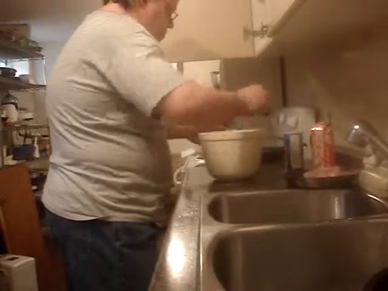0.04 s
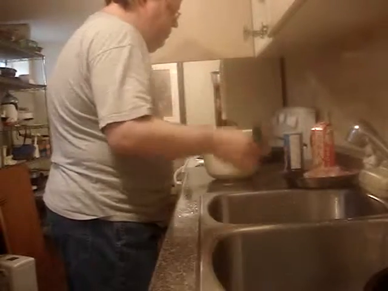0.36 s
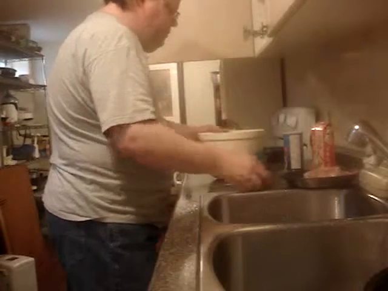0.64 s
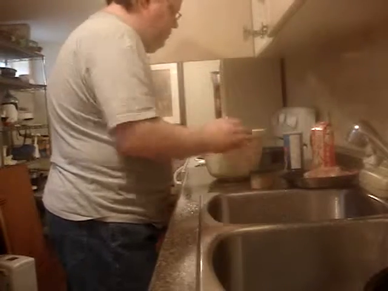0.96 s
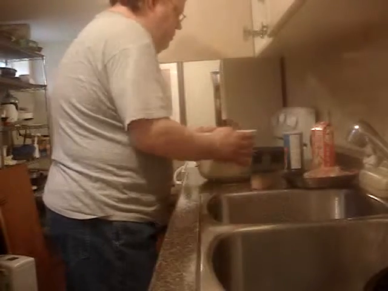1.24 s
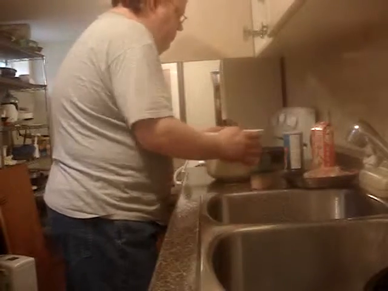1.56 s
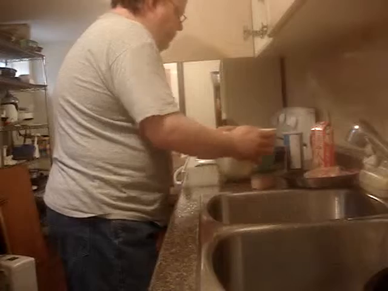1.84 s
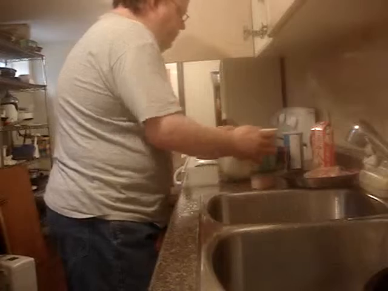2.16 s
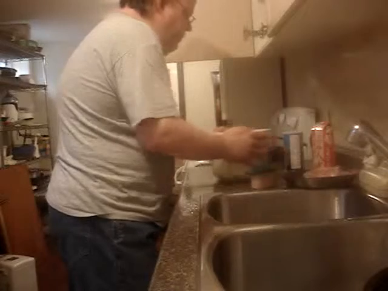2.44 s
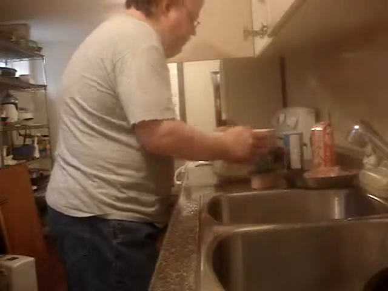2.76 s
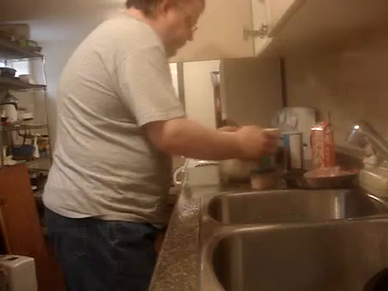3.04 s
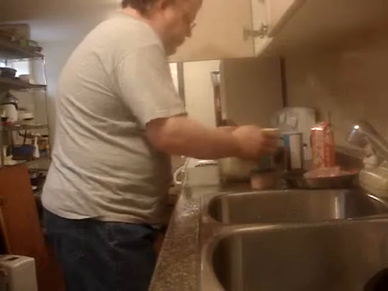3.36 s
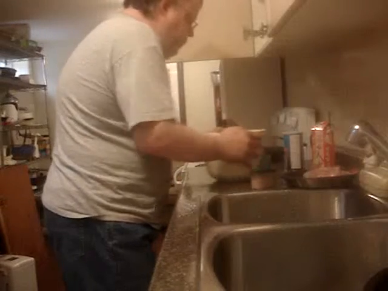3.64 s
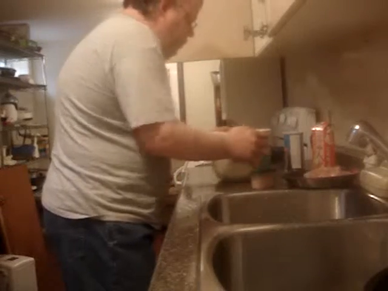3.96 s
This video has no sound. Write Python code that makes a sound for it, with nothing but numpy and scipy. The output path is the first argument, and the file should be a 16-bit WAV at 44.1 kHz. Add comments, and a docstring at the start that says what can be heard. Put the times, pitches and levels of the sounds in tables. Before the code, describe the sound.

A plastic tub is shaken in a small, hard kitchen. First, from 0.7 to 0.9 seconds, a small container rocks to rest on the counter in four ringing clacks, the loudest thumping the microphone. From 1.2 to 4 seconds the tub shakes about eight strokes a second: dry coating swishes, walls rumble and heavier pieces thud, louder after 3 seconds. Faint room noise, hum and a thin whine continue throughout.

```python
"""Faint room noise, an appliance hum and a thin whine fill a hard little kitchen. A small container is
set down and rocks to rest in four clacks that ring it and the counter; the loudest overload the recorder
with a low thump. Then a lidded plastic tub is shaken about eight strokes a second: dry coating swishes
along the plastic, the walls rumble under the load and heavier pieces thud against them.
A limiter holds down loud peaks."""
import sys
import numpy as np
from scipy import signal
from scipy.fft import rfft, irfft
from scipy.io import wavfile
from scipy.ndimage import uniform_filter1d, minimum_filter1d

SR = 44100
rng = np.random.default_rng(int(sys.argv[2]) if len(sys.argv) > 2 else 0)


def int16_out(signal):
    """Quantize to a 16-bit WAV file."""
    q = np.round(np.clip(np.atleast_2d(signal).T, -1, 1) * 32767)
    wavfile.write(sys.argv[1], SR, q.astype(np.int16))


N = 176400
TIME_S = np.arange(N) / SR
EVENT_S = np.arange(SR // 2) / SR
CONTACT_RISE_S, STROKE_LEAD_S = 0.0019, 0.1

# Shake strokes: t/s of fastest slide, relative level/dB, length/usual stroke
SHAKE_STROKES = [(1.213, -9, .6), (1.339, -7, 0.78), (1.44, -7, 0.73), (1.477, -1, .9), (1.605, -2.5, 0.97),
                 (1.734, -2.5, 1.1), (1.86, -5, 1), (1.975, -1.5, .9), (2.10, -2.5, 1.07),
                 (2.217, -1, 0.98), (2.349, -1.5, .9), (2.462, 1.5, 0.86), (2.58, -0.5, 1.08),
                 (2.703, 0.5, 1.23), (2.826, 1, 0.85), (2.942, -0.5, 1.13), (3.069, 1.5, 0.93),
                 (3.18, -0.5, 1.17), (3.319, -0.5, 1.21), (3.42, 1.5, 0.68), (3.544, -1, 1.15),
                 (3.655, -2, 1.03), (3.774, -2, 1.23), (3.885, -0.5, 0.97), (3.995, 1, 0.65)]


def amp(db):
    """Decibels to gain."""
    return 10 ** (np.asarray(db) / 20)


def unit(x):
    """Scale to rms 1."""
    return x / np.sqrt(np.mean(x ** 2) + 1e-20)


def read(points, hz):
    """Interpolate on a log-frequency axis."""
    f, value = np.transpose(points)
    return np.interp(np.log(hz + 1), np.log(f + 1), value)


def gain_curve(points):
    """Scene-long gain from (t/s, level/dB) points."""
    return amp(np.interp(TIME_S, *np.transpose(points)))


def add(mix, start_s, sound):
    """Mix a sound in at start_s."""
    part = mix[round(start_s * SR):][:len(sound)]
    part += sound[:len(part)]


def colour(x, points, size=4096):
    """Minimum-phase filter of unit energy, shaped by (f/Hz, level/dB) points."""
    log_gain = np.log(amp(read(points, abs(np.fft.fftfreq(size, 1 / SR)))))
    taps = np.fft.ifft(np.exp(np.conj(signal.hilbert(log_gain)))).real
    return signal.oaconvolve(x, taps / np.linalg.norm(taps))[:len(x)]


def room_noise():
    """Dull steady noise, a little louder at the start."""
    # Noise spectrum: f/Hz, relative level/dB
    spectrum = [(25, -11), (80, -21), (120, -5), (150, -8.5), (210, -3.5), (300, -9.5), (700, -8.5),
                (1200, -14), (3000, -18.5), (5000, -23), (8000, -25.5), (10000, -27)]
    # Noise envelope: t/s, level/dB
    levels = [(0, -43.5), (.15, -48), (.35, -50), (4, -48)]
    return gain_curve(levels) * colour(rng.standard_normal(N), spectrum)


def appliance_hum(hz=119.6, rms_db=-58.5):
    """One low steady tone."""
    return amp(rms_db) * unit(np.sin(2 * np.pi * hz * TIME_S))


def whine(centre_hz=7900, half_width_hz=97, rms_db=-65):
    """A narrow band of high noise."""
    hz = np.fft.rfftfreq(N, 1 / SR)
    band = 1 / (1 + ((hz - centre_hz) / half_width_hz) ** 2)
    return amp(rms_db) * unit(irfft(rfft(rng.standard_normal(N)) * band, N))


def chatter(t60_s):
    """Noise of one contact: quick swell, exponential decay."""
    attack = np.minimum(EVENT_S / CONTACT_RISE_S, 1)
    return rng.standard_normal(len(EVENT_S)) * attack * amp(-60 * EVENT_S / t60_s)


def container_clacks(crack_db=-6, ring_db=-26, emphasis_octaves=0.97):
    """Each contact cracks, ticks and rings the counter, favouring its own pitch range."""
    # Contacts: t/s, relative level/dB, emphasis f/Hz, emphasis/dB, tick/dB, overload thump/dB
    contacts = [(.690, 4.5, 567, 4.5, -22, -21), (.773, -3, 427, 5, -21, -55),
                (0.8644, -3, 1500, 9, -27.5, -25.5), (.917, -10, 450, 6.5, -58, -65)]
    # Crack spectrum: f/Hz, relative level/dB
    crack_spectrum = [(50, -47), (120, -13.5), (200, -4.5), (330, 1), (560, 0.5), (850, -1), (1200, -6),
                      (1800, -9), (2500, -18), (3500, -30.5), (7000, -40), (10000, -41)]
    # Tick spectrum: f/Hz, relative level/dB
    tick_spectrum = [(500, -32), (1500, -4), (2500, 10), (4000, -2), (7000, -8.5), (10000, -25)]
    # Container and counter modes: f/Hz, relative level/dB, t60/s
    counter_modes = [(369, 2.5, 0.21), (539, 2, 0.15), (588, -7, 0.19), (757, -4, 0.4), (855, -5, 0.27),
                     (1038, -14, 0.27), (1090, -5.5, 0.25), (1200, -11, .25), (1216, -8.5, .22),
                     (1524, -1, .2), (1770, -9, .15), (2490, -16, .2)]
    out = np.zeros(N)
    attack = np.minimum(EVENT_S / CONTACT_RISE_S, 1)
    for start_s, db, emphasis_hz, emphasis_db, tick_db, thump_db in contacts:
        def boost_db(hz):
            return emphasis_db * np.exp(-(np.log2(hz / emphasis_hz) / emphasis_octaves) ** 2 / 2)
        boosted = [(hz, level_db + boost_db(hz)) for hz, level_db in crack_spectrum]
        crack = amp(db + crack_db) * colour(chatter(t60_s=0.067), boosted)
        tick = amp(tick_db) * colour(chatter(t60_s=0.048), tick_spectrum)
        ring = np.zeros(len(EVENT_S))
        for hz, mode_db, t60_s in counter_modes:
            decay = amp(mode_db + boost_db(hz) - 60 * EVENT_S / t60_s)
            ring += decay * np.sin(2 * np.pi * (hz * EVENT_S + rng.random()))
        add(out, start_s, kitchen(crack + tick, wet_db=-6))
        add(out, start_s, amp(db + ring_db) * ring * attack + overload_thump(thump_db))
    return out


def overload_thump(peak_db, rise_s=0.0015):
    """Low one-sided pulse of the recorder overloading on a loud clack."""
    return amp(peak_db) * EVENT_S / rise_s * np.exp(1 - EVENT_S / rise_s)


def kitchen(x, wet_db, predelay_s=0.004):
    """Add dense reflections, each band dying at its own rate."""
    # Room decay: f/Hz, t60/s
    room_t60 = [(100, 0.24), (250, .33), (550, 0.43), (1400, 0.43), (3700, 0.3), (10000, 0.14)]
    reflections = rng.standard_normal(len(EVENT_S)) * (EVENT_S > predelay_s)
    hz, t, bands = signal.stft(reflections, SR, nperseg=256)
    fade = amp(-60 * t / read(room_t60, hz)[:, None])
    tail = signal.istft(bands * fade, SR, nperseg=256)[1]
    return x + amp(wet_db) * signal.oaconvolve(x, tail / np.linalg.norm(tail))[:len(x)]


def slide(length, rise_s=0.03, fall_s=0.028):
    """Envelope of one stroke's slide, stretched by length, peaking at STROKE_LEAD_S."""
    t = EVENT_S - STROKE_LEAD_S
    width_s = length * np.where(t < 0, rise_s, fall_s)
    return np.exp(-abs(t / width_s) ** 1.5 / 2)


def coating_swish(gain_db=-33.5, grains_per_s=9000, spread_db=1.5, clump_db=1.9, clump_s=0.014):
    """Each stroke throws a clumpy shower of crumbs along the plastic."""
    # Crumbs on plastic: f/Hz, relative level/dB
    spectrum = [(530, -32), (900, -2.5), (1160, -7), (1860, -1.5), (2040, -4.5), (2700, -5), (3300, -4),
                (5200, -10.5), (7030, -13), (8680, -15), (10000, -24), (13000, -85), (22000, -120)]
    swish, n = np.zeros(N), len(EVENT_S)
    for peak_s, db, length in SHAKE_STROKES:
        clumps = np.interp(EVENT_S / clump_s, np.arange(n), rng.standard_normal(n))
        size = amp(clump_db * clumps + spread_db * np.minimum(rng.exponential(1, n), 4))
        grains = rng.standard_normal(n) * size * (rng.random(n) < grains_per_s / SR)
        shower = amp(db) * unit(grains) * slide(length)
        add(swish, peak_s - STROKE_LEAD_S, kitchen(shower, wet_db=-6.5))
    return amp(gain_db) * colour(swish, spectrum)


def wall_rumble():
    """The tub walls rumble under the sliding load, swelling with each stroke."""
    # Wall response: f/Hz, relative level/dB
    spectrum = [(30, -19.5), (55, -15), (72, -2.5), (92, -7), (120, 6.5), (150, 7.5), (200, -4), (290, -8),
                (370, 3), (460, -8.5), (560, 0), (670, -3.5), (790, -1), (1000, -18), (1500, -25.5),
                (3000, -31)]
    # Rumble envelope: t/s, gain/dB
    levels = [(1.15, -56), (1.22, -34), (1.55, -34), (2.3, -32), (2.8, -32.5), (3.3, -31), (3.65, -29),
              (4, -31.5)]
    load = np.zeros(N)
    for peak_s, db, length in SHAKE_STROKES:
        add(load, peak_s - STROKE_LEAD_S, amp(db) * slide(length))
    drive = rng.standard_normal(N) * (0.41 + 0.57 * load)
    return gain_curve(levels) * colour(drive, spectrum)


def piece_thuds():
    """A piece flexes the wall for a few sagging cycles, knocks and snaps the plastic, heaves the tub."""
    # Wall hits: t/s, thud level/dB, nominal f/Hz, knock level/dB, snap level/dB (levels relative)
    hits = [(1.207, -35, 116, -37, -32.5), (1.262, -32, 175, -44, -55), (1.329, -28, 197, -26, -33.5),
            (1.372, -27, 201, -41, -39), (1.53, -17, 248, -30, -34.5), (1.595, -17.5, 285, -23.5, -49),
            (1.666, -19, 172, -38, -49), (1.803, -17, 235, -30.5, -29.5), (1.915, -25, 168, -36, -33),
            (2.017, -22, 206, -32, -44), (2.089, -15, 252, -26.5, -42), (2.152, -23.5, 179, -47, -37),
            (2.257, -29, 213, -42.5, -50), (2.299, -21, 166, -29.5, -34), (2.396, -22.5, 196, -40, -33),
            (2.497, -26.5, 372, -42, -42), (2.537, -20, 205, -45, -29.5), (2.603, -20, 256, -25, -32),
            (2.65, -32, 158, -33, -34), (2.782, -18.5, 215, -42.5, -34), (2.835, -20.5, 377, -16, -24.5),
            (2.883, -17, 207, -33, -31.5), (3.006, -22.5, 205, -32, -27), (3.028, -16, 260, -16.5, -33),
            (3.122, -19, 188, -32, -32), (3.131, -17, 144, -39, -34.5), (3.239, -19, 169, -38, -32.5),
            (3.297, -15.5, 213, -22, -28.5), (3.311, -14, 251, -20, -30), (3.36, -13.5, 206, -30, -28),
            (3.377, -15.5, 263, -37, -34), (3.501, -9, 260, -24.5, -31), (3.599, -8.5, 230, -27.5, -22.5),
            (3.618, -21, 234, -32, -39), (3.707, -11.5, 271, -28.5, -36), (3.75, -11.5, 215, -36, -33),
            (3.825, -13, 257, -25, -17), (3.971, -15, 195, -46, -25), (3.983, -21, 153, -24.5, -17.5)]
    # Knock spectrum: f/Hz, relative level/dB
    knock_spectrum = [(100, -18), (150, 4.5), (250, -2.5), (380, 2.5), (470, -3), (560, 4), (670, -6.5),
                      (780, 2.5), (1000, -11.5), (1500, -15), (3000, -40.5), (10000, -47)]
    # Snap spectrum: f/Hz, relative level/dB
    snap_spectrum = [(200, -36.5), (900, -7.5), (1700, 12.5), (3000, 4.5), (5000, -6), (10000, -18)]
    flex_rise_s, sag, overtone_ratio, overtone_db = 0.005, 0.35, 1.668, -10
    heave_rise_s, heave_hz, heave_db = 0.015, 74, -26
    thud_lag_s, knock_lag_s = 0.001497, 0.002
    flex_age, heave_age = EVENT_S / flex_rise_s, EVENT_S / heave_rise_s
    flex_envelope = (flex_age * np.exp(1 - flex_age)) ** 2
    glide = 1 + sag * (2 * np.exp(-flex_age / 2) - 1)  # from 1 + sag down to 1 - sag
    heave = amp(heave_db) * heave_age * np.exp(1 - heave_age) * np.sin(2 * np.pi * heave_hz * EVENT_S)
    first_touch = amp(20) * (EVENT_S == 0)
    out = np.zeros(N)
    for start_s, db, hz, knock_db, snap_db in hits:
        phase = 2 * np.pi * np.cumsum(hz * glide) / SR
        overtone = amp(overtone_db) * np.sin(overtone_ratio * phase + 2 * np.pi * rng.random())
        thud = amp(db + 0.5) * flex_envelope * (np.sin(phase) + overtone)
        knock = amp(knock_db + 3) * colour(chatter(t60_s=0.07) + first_touch, knock_spectrum)
        snap = amp(snap_db + 0.5) * colour(chatter(t60_s=0.05), snap_spectrum)
        add(thud, knock_lag_s, knock + snap)
        add(out, start_s + thud_lag_s, kitchen(thud, wet_db=-7.5) + amp(db) * heave)
    return out


def scene():
    """Container, shaken tub and background in mono."""
    clacks = container_clacks()
    tub = piece_thuds() + coating_swish() + wall_rumble()
    background = room_noise() + appliance_hum() + whine()
    return (clacks + tub + background)[None]


def record(dry):
    """A limiter ducks just ahead of loud peaks; a steep low-pass follows."""
    ceiling_db, look_ahead_s, cutoff_hz = -4, 0.022, 10160
    span = int(look_ahead_s * SR) // 2 * 2 + 1
    allowed = np.minimum(1, amp(ceiling_db) / (abs(dry[0]) + 1e-9))
    held = minimum_filter1d(allowed, span, origin=-(span // 2))
    gain = uniform_filter1d(held, size=64)
    lowpass = signal.firwin(511, cutoff_hz, window=("kaiser", 9), fs=SR)
    return signal.oaconvolve(dry * gain, lowpass[None], "same")


dry = scene()
out = record(dry)
int16_out(out)
```